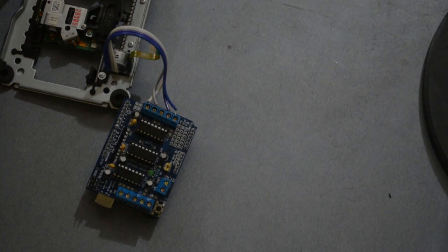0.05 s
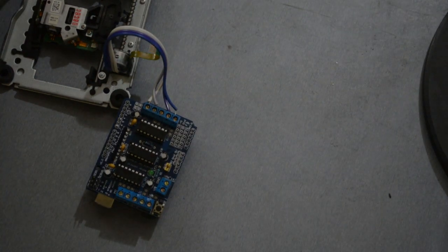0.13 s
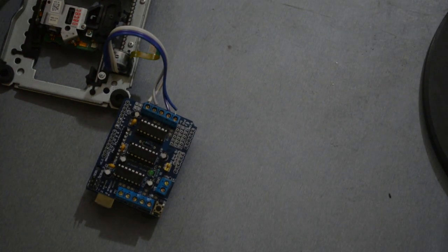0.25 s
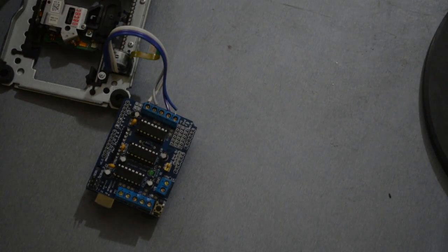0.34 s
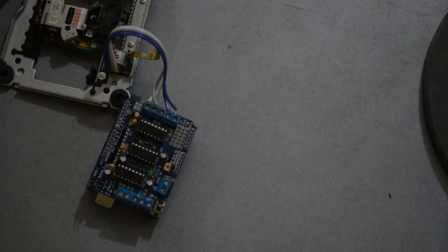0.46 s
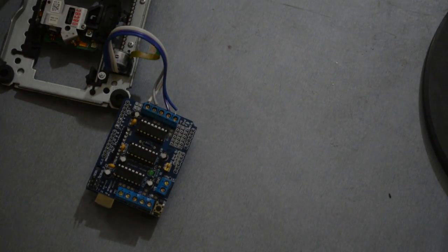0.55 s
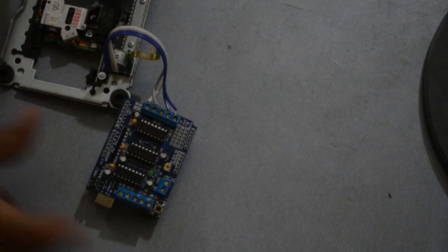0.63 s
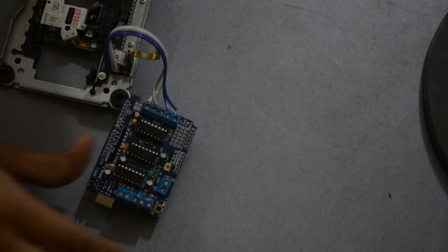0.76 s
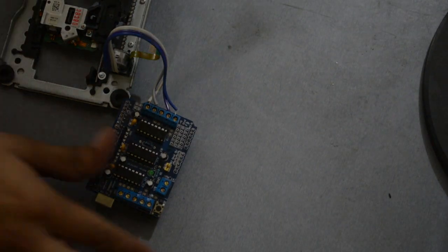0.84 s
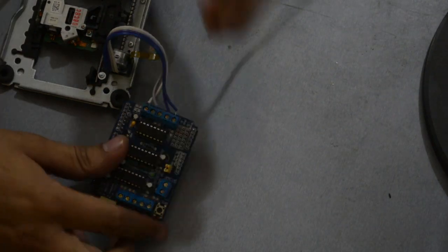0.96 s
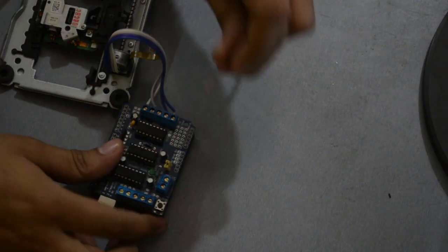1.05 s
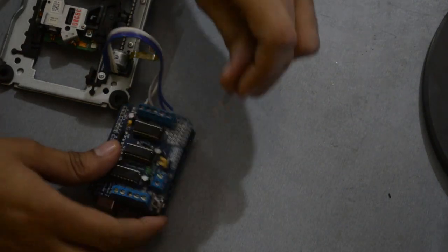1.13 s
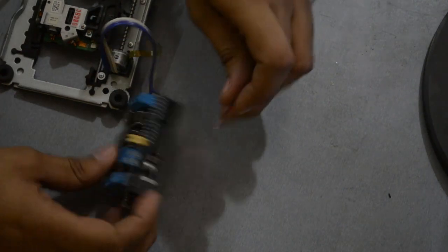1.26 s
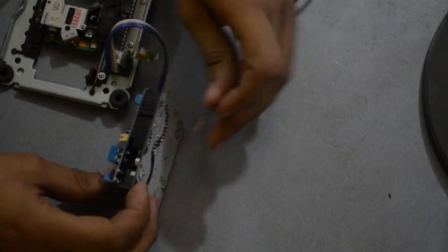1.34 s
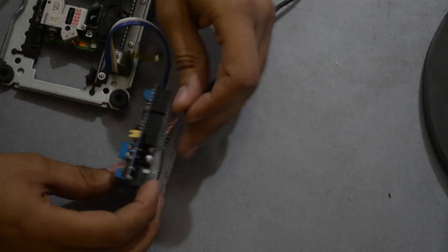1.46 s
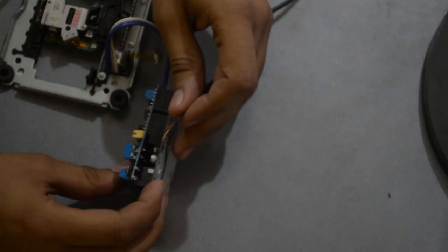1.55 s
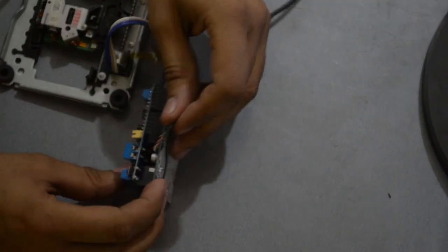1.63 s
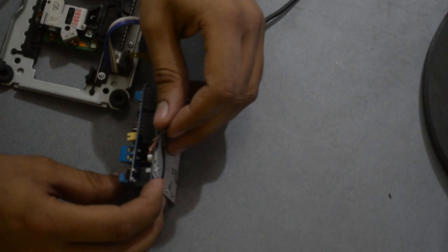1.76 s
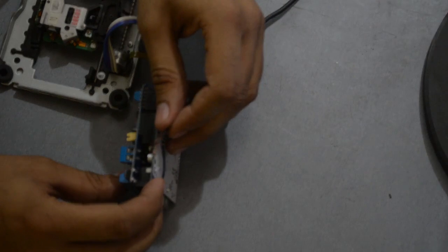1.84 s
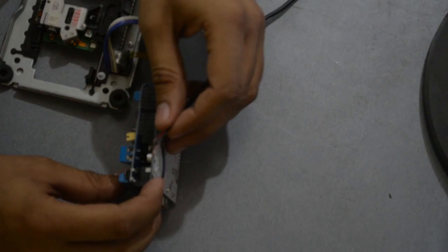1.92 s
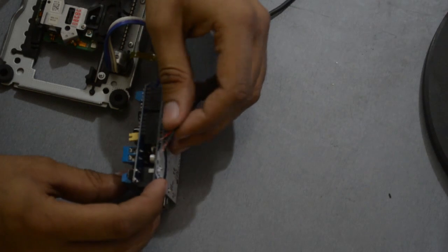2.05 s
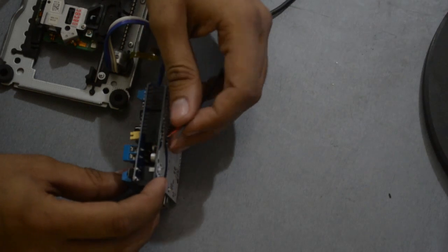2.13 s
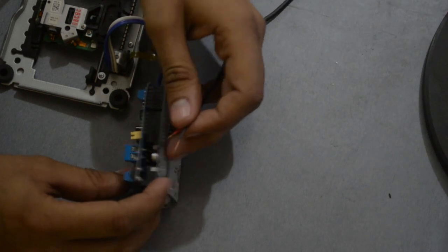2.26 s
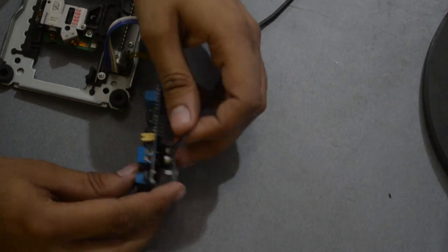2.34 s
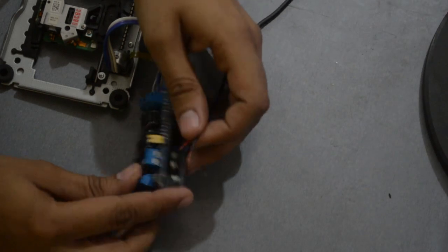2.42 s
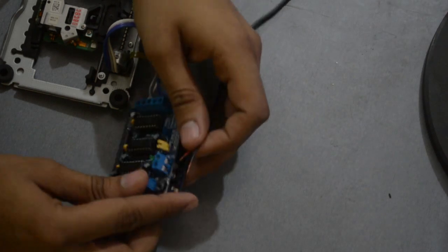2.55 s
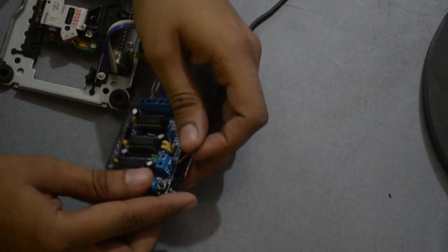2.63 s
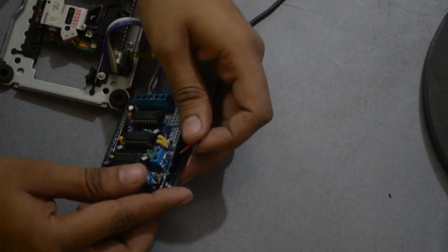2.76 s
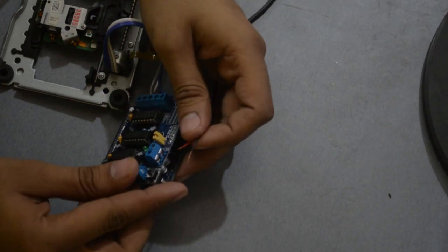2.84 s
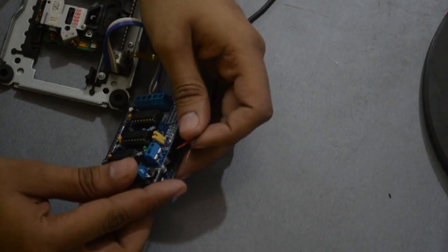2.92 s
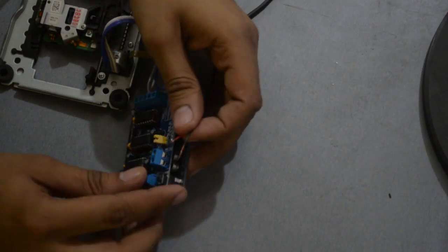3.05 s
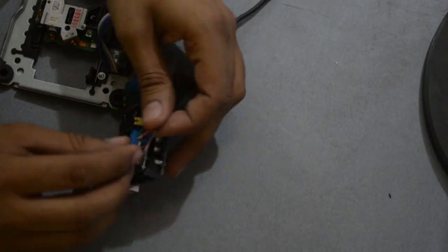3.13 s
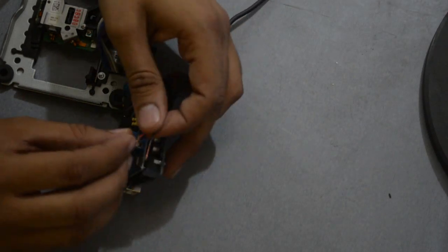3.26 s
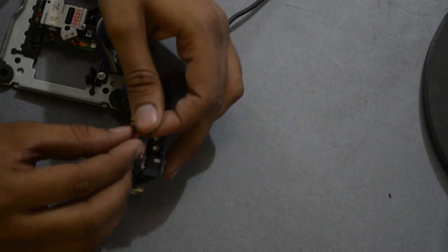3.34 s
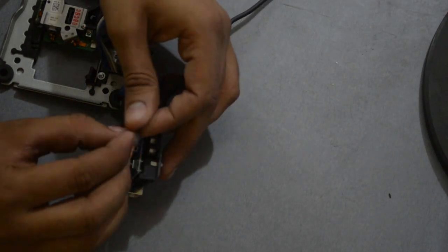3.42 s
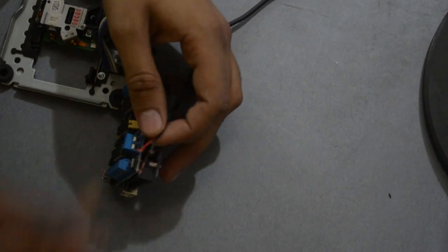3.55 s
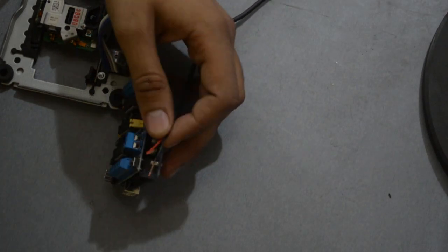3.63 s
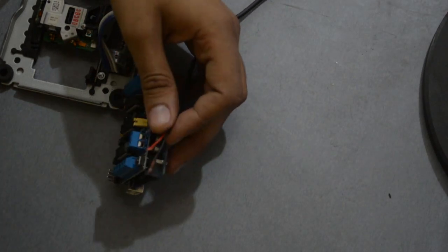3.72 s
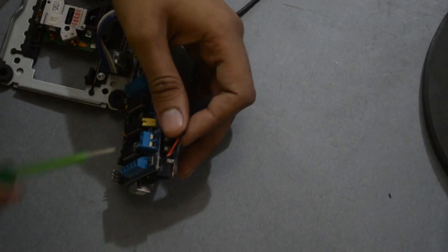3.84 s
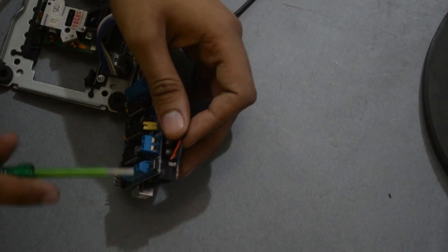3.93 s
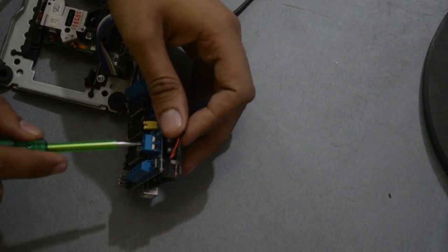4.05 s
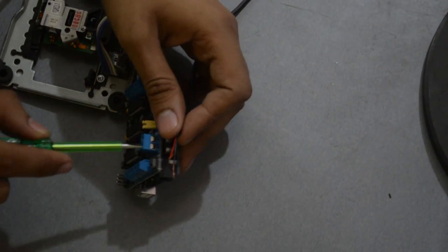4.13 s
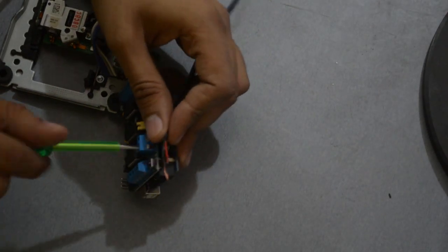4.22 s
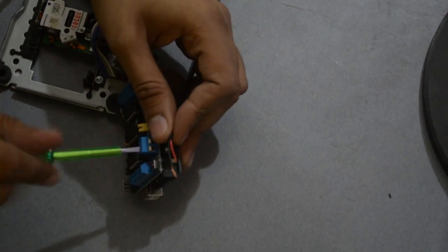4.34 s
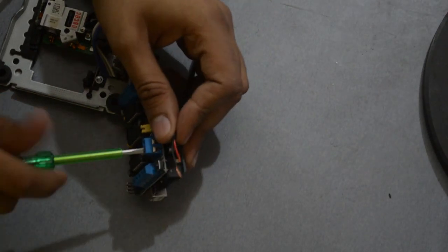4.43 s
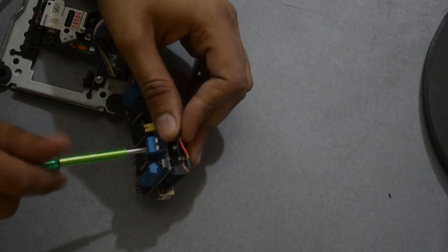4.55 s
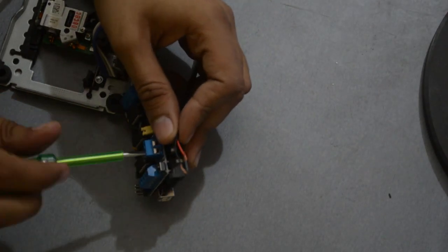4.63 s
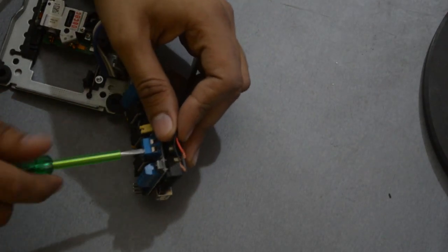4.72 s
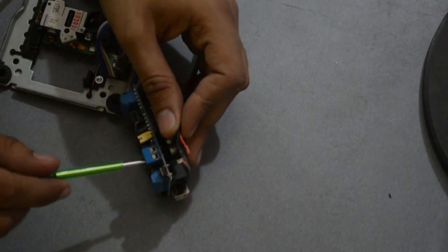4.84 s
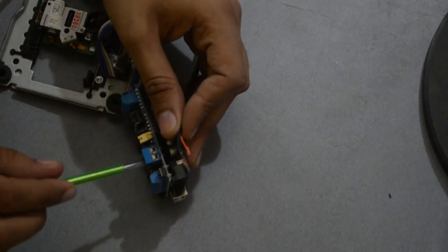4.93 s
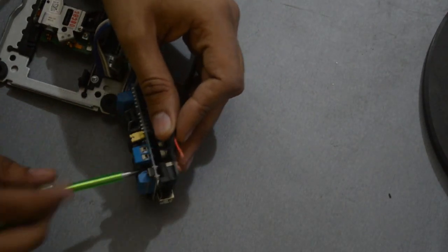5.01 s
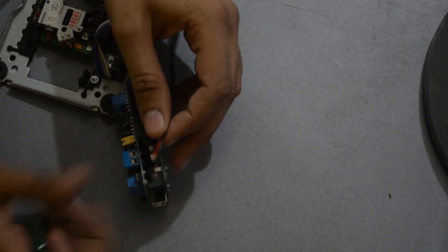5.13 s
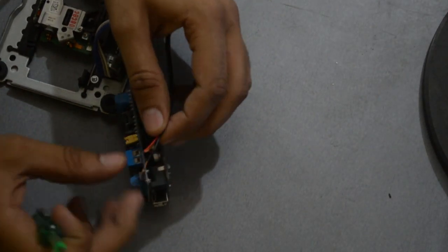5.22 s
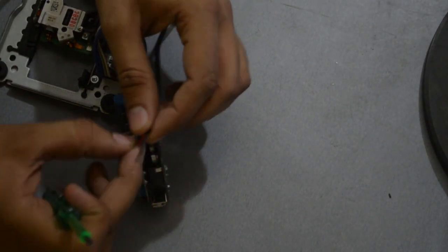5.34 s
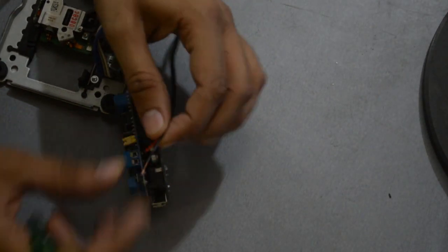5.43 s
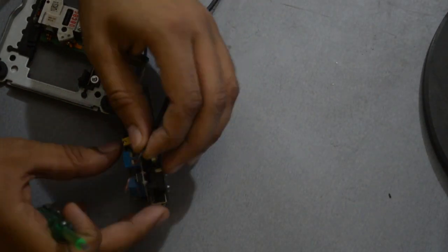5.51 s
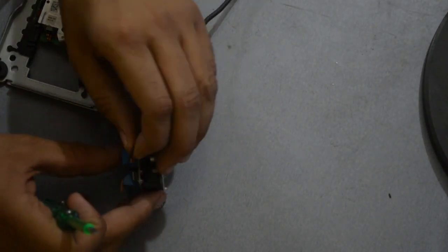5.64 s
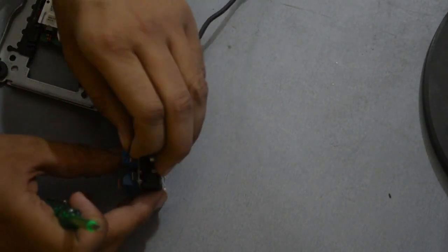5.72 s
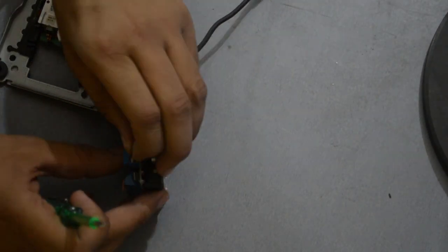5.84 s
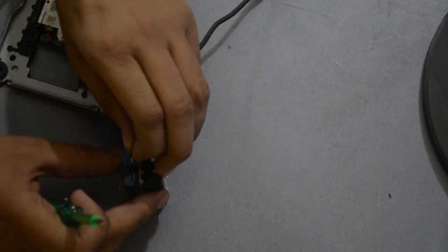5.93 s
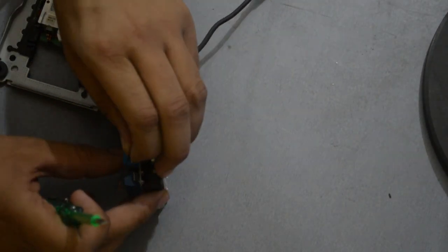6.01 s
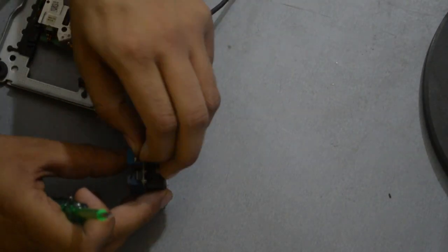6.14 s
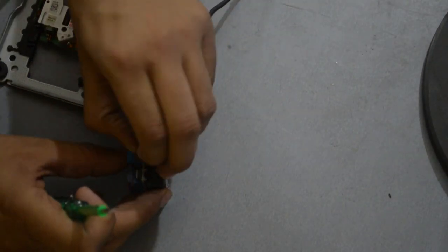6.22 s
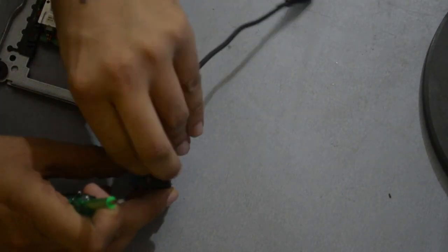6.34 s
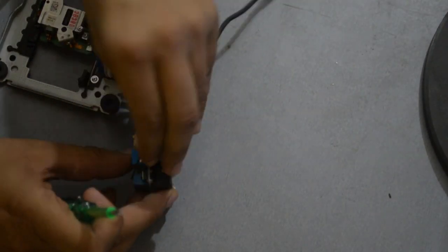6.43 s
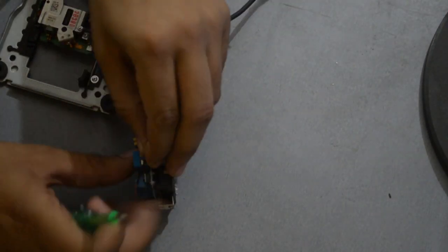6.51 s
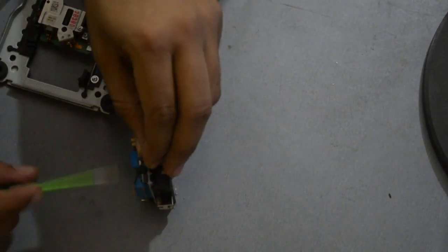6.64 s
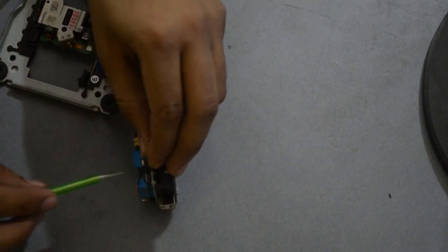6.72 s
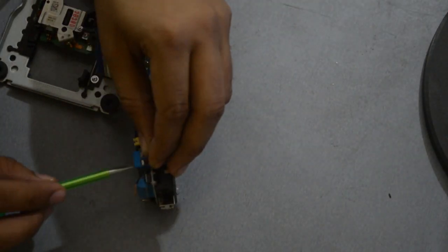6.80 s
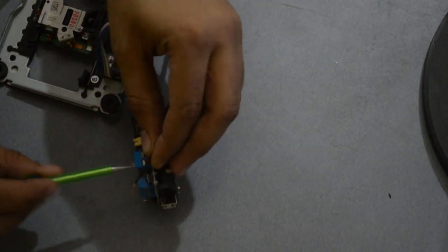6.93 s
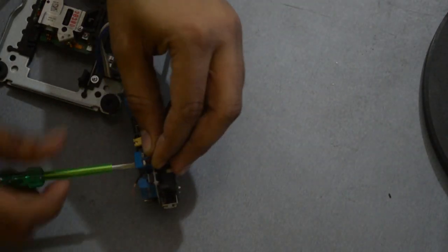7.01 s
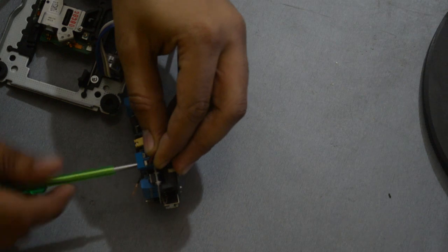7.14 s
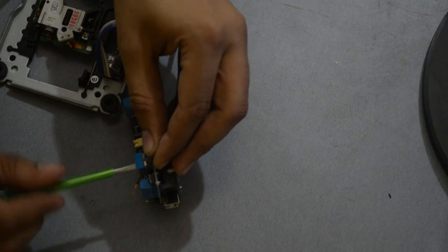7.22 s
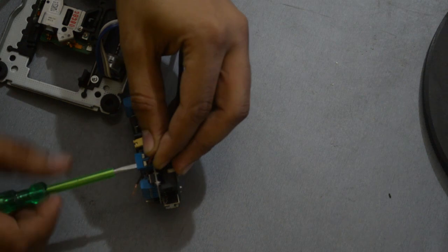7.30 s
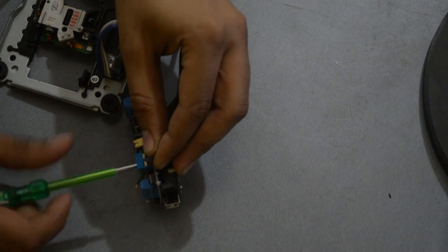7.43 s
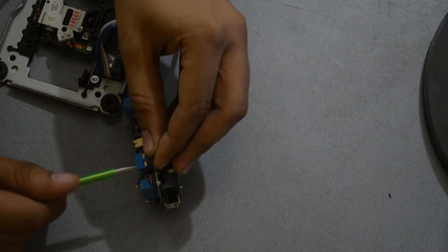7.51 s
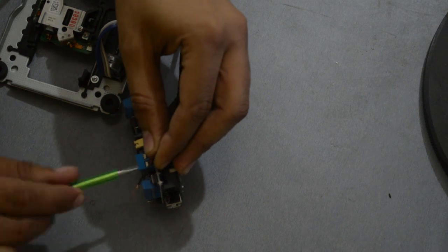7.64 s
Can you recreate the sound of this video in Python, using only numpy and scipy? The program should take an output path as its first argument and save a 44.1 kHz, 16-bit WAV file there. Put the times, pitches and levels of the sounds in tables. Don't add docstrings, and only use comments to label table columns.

```python
import sys
import numpy as np
from scipy import signal
from scipy.fft import rfft, irfft
from scipy.io import wavfile
from scipy.ndimage import uniform_filter1d, map_coordinates

SR = 44100
rng = np.random.default_rng(int(sys.argv[2]) if len(sys.argv) > 2 else 0)


def decibels_to_gain(level_db):
    exponent = np.asarray(level_db, float) / 20
    return 10 ** exponent


def wrap_up_sound(samples):
    columns = np.atleast_2d(samples).T
    tamed = np.clip(columns, -1, 1)
    steps = np.round(tamed * 32767).astype(np.int16)
    wavfile.write(sys.argv[1], SR, steps)


N = 338247
CUT_S, SLOW, FAST = 2.785, 1.0, 3.24


def on_log(table, hz):
    return np.interp(np.log(hz + 1), np.log(np.array(table)[:, 0]), np.array(table)[:, 1])


def unit(x):
    return x / np.sqrt(np.mean(x ** 2))


def curve(table, silent_db=-110):
    s, *columns = np.transpose(table)
    t = np.arange(N) / SR
    return [decibels_to_gain(np.interp(t, s, column, silent_db, silent_db)) for column in columns]


def band(x, low_hz, high_hz):
    edges = np.clip([low_hz, high_hz], 5, .45 * SR)
    return signal.sosfilt(signal.butter(2, edges, "band", fs=SR, output="sos"), x)


def spread(mid, side, speed, width):
    share = on_log(width, np.fft.rfftfreq(len(side), 1 / SR) / speed)
    side = irfft(rfft(side) * share, len(side))
    return np.array([mid + side, mid - side])


# frequency_hz, density_db
AIR_SPECTRUM = [(20, -86), (45, -27), (80, -14.5), (145, -5.5), (200, -7), (280, -9.5), (330, -1.5),
                (630, -0.5), (1070, -3), (1630, -8), (2400, -13), (5000, -21.5), (11000, -31.5),
                (16000, -42.5)]
# time_s, level_db
AIR_LEVEL = [(0, -50.5), (.9, -50.5), (1.6, -46.5), (2.3, -51.5), (2.78, -50), (2.8, -51), (4, -50.5),
             (5.5, -51.5), (7.67, -50)]
# frequency_hz, width_hz, level_db
AIR_PEAKS = [(311, 19, -63.5), (521, 8.9, -65), (664, 10, -68.5), (1036, 79, -65.5)]
# frequency_hz, side_share
AIR_WIDTH = [(50, .12), (150, 0.19), (400, 0.2), (1000, 0.3), (2000, 0.56), (4000, 0.67), (10000, 0.75)]


def air(speed, flicker_db=1):
    hz = np.fft.rfftfreq(N, 1 / SR) / speed
    white = rfft(rng.standard_normal((4, N)))
    wide = unit(irfft(white[:2] * decibels_to_gain(on_log(AIR_SPECTRUM, hz)), N)) * curve(AIR_LEVEL)[0]
    peaks = 0
    for centre_hz, width_hz, db in AIR_PEAKS:
        resonance = 1 / (1 + 1j * 2 * (hz - centre_hz) / width_hz) ** 2
        peaks = peaks + decibels_to_gain(db) * unit(irfft(white[2:] * resonance, N))
    step = int(.1 * SR / speed)
    walk = uniform_filter1d(np.repeat(rng.standard_normal(N // step + 1), step), step)[:N]
    return spread(*((wide + peaks) * decibels_to_gain(flicker_db * walk)), speed, AIR_WIDTH)


# harmonic_order, level_db
HUM = [(1, -70), (2, -61), (3, -60), (7, -66), (9, -66.5), (13, -63), (17, -107.5), (29, -71), (35, -76),
       (37, -73), (39, -76.5), (51, -87)]


def hum(speed, mains_hz=50.0, flutter=0.097):
    t = np.arange(N) * speed / SR
    lines = 0
    for order, db in HUM:
        turns = round(order) * mains_hz * t + rng.random()
        lines = lines + np.sqrt(2) * decibels_to_gain(db) * np.sin(2 * np.pi * turns)
    return lines * (1 + flutter * unit(band(rng.standard_normal(N), 6 * speed, 25 * speed)))


RATTLE_S, CONTACT_S = .0007, 0.0013


def ring(modes, speed, scatter_db=1.5, detune=0.016, crack=0.44, rattle_s=RATTLE_S, snap_s=0.0043):
    hz, db, t60 = np.transpose(modes)[:, :, None]
    t = np.arange(int(.2 * SR / speed)) * speed / SR
    level_chance, pitch_chance, delay_chance = rng.standard_normal((3, len(modes), 1))
    since = np.maximum(t - rattle_s * np.minimum(delay_chance ** 2, 3), 0)
    facing = (-1.) ** np.arange(len(modes))[:, None]
    tones = facing * decibels_to_gain(db + scatter_db * level_chance)
    tones = tones * np.sin(2 * np.pi * hz * (1 + detune * pitch_chance) * since)
    tones = (tones * np.exp(-np.log(1000) * since / t60)).sum(axis=0)
    snap = rfft(rng.standard_normal(len(t)) * np.exp(-t / snap_s))
    snap = irfft(snap / np.sqrt(uniform_filter1d(abs(snap) ** 2, size=30)), len(t)) * (t < .1)
    low_hz, high_hz = hz.min() * speed, hz.max() * speed
    tones, snap = band([tones, snap], 0.53 * low_hz, 1.07 * high_hz)
    snap = band(snap, 0.71 * low_hz, high_hz)
    blow = tones / abs(tones).max() + crack * snap / abs(snap).max()
    blow = blow * (1 - np.exp(-t / CONTACT_S))
    return blow / abs(blow).max()


def knocks(table, parts, speed, trim_db, crack=0.49, rattle_s=RATTLE_S, snap_s=0.0035):
    out = np.zeros(N + SR)
    for s, peak_db, *parts_db in table:
        for modes, db in zip(parts, parts_db):
            blow = ring(modes, speed, crack=crack, rattle_s=rattle_s, snap_s=snap_s)
            start = int(s * SR)
            out[start:start + len(blow)] += blow * decibels_to_gain(peak_db + db + trim_db)
    return out[:N]


# frequency_hz, level_db, t60_s
BENCH = [(319.1, -2, 0.21), (336.7, -7.5, 0.075), (275, -36.5, 0.03), (427, -9, 0.12)]
BOARD_LOW = [(454, -4, 0.017), (610, -3, 0.017), (611, -6.5, 0.032), (767, 10.5, 0.0035), (955, 4, 0.019)]
BOARD_MID = [(1007, -5.5, 0.013), (1010, -11, 0.0058), (1220, -3, 0.022), (1289, 1, 0.018),
             (1300, 3, 0.0043), (1554, -20, 0.006), (1675, -7, 0.0068)]
BOARD_HIGH = [(1977, -1, 0.013), (2066, -6, 0.018), (2250, -2, 0.011), (2310, -11, 0.027),
              (2564, 5, 0.0066), (3016, -6.5, 0.025), (3370, -10, 0.0075), (3600, -10, 0.011),
              (4100, -1, 0.002), (4500, -18.5, 0.01)]
BOARD = (BENCH, BOARD_LOW, BOARD_MID, BOARD_HIGH)


def struck(table, speed, trim_db, crack, resting_db):
    blows = [(s, db, bench_db + resting_db, flex_db, 0, hard_db)
             for s, db, bench_db, flex_db, hard_db in table]
    return knocks(blows, BOARD, speed, trim_db, crack=crack)


# start_s, board_middle_db, then relative to it bench_db, flex_db, hardness_db
KNOCKS = [(0.959, -15.5, -10, -10, 0), (0.964, -22.5, -21, -3, -2), (1.0365, -10, -33, 2.5, 8.5),
          (1.0405, -13.5, -2, -8, -2), (1.043, -21, -16, -9, -1), (1.047, -32, 0, -21, -21),
          (1.072, -12, -5, -7, 10.5), (1.076, -16.5, -18.5, -6, 8), (1.082, -28, 0, -12, -3),
          (1.088, -23, 3, 4, -3), (1.157, -13.5, -17, -5, -16), (1.3035, -7, -9, -7, -7),
          (1.3505, -5, -15.5, -6.5, -6.5), (1.364, -15, -16, -6, -9), (2.4, -31, 3, 5.5, -5),
          (2.412, -50, -12, -1, -10), (2.499, -36.5, 4, -2, 8.5)]


def board_knocks():
    return struck(KNOCKS, SLOW, 0.58, crack=0.63, resting_db=0.5)


# frequency_hz, level_db, t60_s
METAL = [(4600, -12, 0.004), (4850, -7, 0.0058), (4870, 3.5, 0.0041), (5740, -8, 0.0013),
         (6600, -14, 0.0026), (7500, -1, 0.005), (9340, 0.5, 0.0043), (11060, -4, 0.0042)]
# start_s, peak_db, metal_db
JOLTS = [(0.9592, -26.5, -2), (1.036, -14.5, -5.5), (1.073, -11, -4), (1.305, -25.5, 2), (1.3519, -18, 2),
         (2.4009, -41, 0)]


def jolts():
    return knocks(JOLTS, [METAL], SLOW, 0.28)


# start_s, peak_db, pitch_hz, t60_s
PINGS = [(0.9595, -31, 4840, 0.03), (0.965, -17.5, 2700, 0.016), (0.966, -16, 1220, 0.024),
         (1.039, -1.5, 1370, 0.015), (1.037, -19, 8500, 0.0068), (1.041, -10, 2920, .012),
         (1.048, -8, 3725, 0.015), (1.06, -23, 4500, .012), (1.055, -24, 4130, 0.013),
         (1.075, -2.5, 2250, 0.014), (1.083, -18, 2700, .012), (1.088, -22, 3900, .012),
         (1.305, -19, 1190, 0.02), (1.315, -33, 4850, 0.036), (1.353, -23, 1370, 0.0061),
         (1.364, -16, 2000, .012), (1.36, -36, 4850, .03), (1.602, -40, 1050, 0.017),
         (1.785, -40, 1300, 0.028), (1.985, -37, 1120, 0.023), (2.403, -22.5, 935, 0.021),
         (2.47, -31, 1974, 0.022), (2.5, -39, 3070, .015), (2.501, -33, 1210, .015)]
# start_s, peak_db, pitch_hz, t60_s
FAST_PINGS = [(3.106, -25, 3050, .008), (3.61, -27.5, 4090, 0.0089), (3.71, -28, 4500, .008),
              (3.739, -24, 5300, 0.0065), (3.826, -22, 4500, 0.011), (3.845, -17, 4410, 0.0085),
              (3.852, -35, 4200, 0.0054), (3.846, -38, 1960, .01), (4.182, -35, 3870, .006),
              (4.527, -26, 3900, 0.0056), (4.835, -32, 2900, .01), (4.835, -33, 6000, .005),
              (5.033, -28.5, 8170, 0.023), (5.033, -17.5, 4150, 0.0038), (6.736, -46, 4000, 0.0093),
              (7.036, -38, 6200, .006), (7.041, -21.5, 6140, 0.0085), (7.042, -25, 3150, 0.0087),
              (7.53, -40, 3320, 0.007), (7.53, -36, 7530, 0.011), (7.531, -38, 4080, .006),
              (7.532, -43, 2430, .007)]


def pings(table, speed):
    out = 0
    for s, db, pitch_hz, t60_s in table:
        hz, t60 = pitch_hz / speed, t60_s * speed
        pair = [(hz, 0, t60), (1.035 * hz, -4, 1.1 * t60)]
        out = out + knocks([(s, db, 0)], [pair], speed, 0, crack=0.065)
    return out


# frequency_hz, level_db, t60_s
LEGS = [(118, -9, 0.17), (159, 1, 0.084), (230, -6, 0.28)]
# start_s, peak_db, legs_db
THUDS = [
    (.96, -40, 2),
    (1.074, -29, 4.5),
    (1.305, -36.5, 1.5),
    (1.352, -32, 2),
]


def thuds():
    return knocks(THUDS, [LEGS], SLOW, 0)


# frequency_hz, t60_s
ROOM_T60 = [(200, 0.62), (400, 0.41), (700, 0.51), (1400, 0.43), (3000, 0.53), (8000, 0.31)]
# frequency_hz, level_db
ROOM_DB = [(200, -6), (400, -2.5), (800, 1.5), (1600, 0), (3000, -5.5), (8000, -2)]
# frequency_hz, side_share
ECHO_WIDTH = [(300, 0.027), (1200, 0.051), (2500, 0.18), (5000, 0.32), (10000, 0.49)]
EARLY_DB, EARLY_S = 0.5, 0.018
DRIFT_S = .00018


def room(dry, speed):
    high = signal.sosfilt(signal.butter(8, 292 * speed, "high", fs=SR, output="sos"), dry)
    bass = band(band(dry, 110 * speed, 230 * speed), 110 * speed, 230 * speed)
    dry = high + decibels_to_gain(-2.5) * bass
    t = np.arange(int(SR / speed)) * speed / SR
    hz = np.fft.rfftfreq(len(t), speed / SR)
    white, tail = rfft(rng.standard_normal((2, len(t)))), 0
    onset = (1 + decibels_to_gain(EARLY_DB) * np.exp(-t / EARLY_S)) * (1 - np.exp(-t / 0.0017))
    for centre_hz in 100 * 2. ** np.arange(8):
        octave = irfft(white * np.clip(1 - abs(np.log2((hz + 1) / centre_hz)), 0, 1), len(t))
        fade = np.exp(-np.log(1000) * t / on_log(ROOM_T60, centre_hz)) * onset
        tail = tail + octave * fade * decibels_to_gain(on_log(ROOM_DB, centre_hz)) / np.sqrt(np.sum(fade ** 2))
    spectrum = rfft(tail)
    power = abs(spectrum) ** 2
    even = np.sqrt(uniform_filter1d(power, size=500) / uniform_filter1d(power, size=16))
    tail = irfft(spectrum * even, len(t)) * (t < .9)
    wet = signal.fftconvolve(dry[None], spread(*tail, speed, ECHO_WIDTH), axes=1)[:, :N]
    wander = unit(band(rng.standard_normal(N), 8 * speed, 30 * speed))
    drift = np.arange(N) + DRIFT_S * SR / speed * wander
    return dry + np.array([map_coordinates(side, [drift], mode="nearest") for side in wet])


def rub(modes, speed, slips_per_s, spread_db=3.5, crack=0.19):
    slips = rng.random(N) < slips_per_s * speed / SR
    slips = slips * decibels_to_gain(spread_db * rng.exponential(size=N)) * rng.choice([-1, 1], N)
    part = ring(modes, speed, scatter_db=0, detune=0, crack=crack)
    return unit(signal.fftconvolve(slips, part)[:N])


# start_s, length_s, running_db, kick_db
LENS = [
    (1.183, 0.037, -41, -46),
    (1.444, 0.15, -46, -41),
    (1.657, 0.24, -48.5, -30.5),
    (1.687, 0.028, -46.5, -62),
    (1.94, 0.077, -42.5, -34),
    (2.019, 0.029, -55, -60),
]


def bursts(kick_s=0.0098, edge_s=0.0028):
    out, t = 0, np.arange(N) / SR
    for s, length_s, run_db, kick_db in LENS:
        on = np.clip(np.minimum(t - s, s + length_s - t) / edge_s + 1, 0, 1)
        kick = decibels_to_gain(kick_db) * np.exp(-np.maximum(t - s, 0) / kick_s)
        out = out + on ** 2 * (decibels_to_gain(run_db) + kick)
    return out


# start_s, peak_db, board_middle_db, board_high_db, gear_db
TICKS = [(1.1875, -42, -29, -31, 11), (1.439, -21, -26, -20, -8.5), (1.475, -26, -28, -17, -3),
         (1.5454, -28, -31, -10, -1), (1.5835, -31, -24, -4, 0), (1.5978, -25, -30, -7.5, -13),
         (1.6536, -30.5, -37, -2, -15), (1.7225, -18, -24, -16, -22), (1.7303, -25, -21, -14, -5.5),
         (1.8911, -34, -34, -6, -4), (1.94, -28, -11, -1, -18), (1.948, -39, -16, 4, -16),
         (1.9819, -34, -11, 0, -21), (1.993, -36, -8, 2, -17), (2.041, -36, -35, -4.5, -8)]
# frequency_hz, level_db, t60_s
GEARS = [(4350, -3, .007), (4720, 0, .009), (5100, -7, .006), (6000, -15, .006), (6800, -15, .006),
         (7450, -13, .006), (9500, -20, .006), (10900, -18, .005)]


def lens(left_db=-3, right_db=-2.0, apart_db=-4):
    running = bursts() * decibels_to_gain(-3.0)
    parts = (BOARD_MID, BOARD_HIGH, GEARS[:6])
    ticks = knocks(TICKS, parts, SLOW, 3, crack=.6, rattle_s=.0001, snap_s=.0013)
    drive = running * rub(GEARS, SLOW, 2700, spread_db=3.5, crack=0.049) + ticks
    apart = decibels_to_gain(apart_db) * (running * rub(GEARS[:5], SLOW, 2500, spread_db=1.5, crack=.3) + ticks)
    return np.array([drive * decibels_to_gain(left_db) - apart, drive * decibels_to_gain(right_db) + apart])


def stroke(s, length_s, db, rise_db=24, fall_db=29):
    u = (np.arange(N) / SR - s) / length_s
    return decibels_to_gain(db - rise_db * np.maximum(-u, 0) - fall_db * np.maximum(u, 0))


def gliding(gain, hz, width_hz):
    phase = 2 * np.pi * np.cumsum(hz * np.ones(N)) / SR
    wobble = band(band(rng.standard_normal((2, N)), 10, width_hz / 2), 10, width_hz / 2)
    return gain * unit(wobble[0] * np.cos(phase) + wobble[1] * np.sin(phase))


# strongest_s, length_s, level_db, centre_hz, width_hz
SWISH = [(1.3, 0.12, -46, 9760, 3520), (2.484, 0.19, -53.5, 7050, 8000), (2.49, 0.17, -51.5, 4600, 2500),
         (2.585, 0.075, -53.5, 5030, 6000), (2.776, 0.056, -55.5, 6970, 6000),
         (2.8, 0.04, -55.5, 13500, 4000), (2.845, 0.07, -53, 12300, 6000), (3.545, 0.03, -57, 10000, 900)]


def brushing():
    out = 0
    for s, length_s, db, hz, width_hz in SWISH:
        gain, hiss = stroke(s, length_s, db), gliding(1, hz, width_hz)
        out = out + spread(gain * hiss, gain * np.roll(hiss, SR), SLOW, ECHO_WIDTH)
    return out


# strongest_s, length_s, strength_db, weight_db, hardness_db
DRAG = [(2.404, 0.011, -29.5, -7, -7), (2.44, 0.14, -40, -12, -5), (2.465, 0.053, -35.5, -24, -2),
        (2.505, 0.055, -36.5, -14, 3.5), (2.575, 0.042, -40, -1, 6), (2.65, 0.08, -65, -2, -9)]
# strongest_s, length_s, strength_db, weight_db, hardness_db
FAST_DRAG = [(3.172, 0.019, -49.5, 20.5, 3.5), (3.206, 0.03, -43, -5, -11), (3.234, 0.039, -65.5, 24, -3),
             (3.774, 0.089, -42, 1.5, -1), (3.8, 0.032, -54, -20, 3), (4.438, 0.032, -41.5, 5.5, -5),
             (5.254, 0.11, -52.5, 6, -7), (5.324, 0.027, -54, 1, -4), (6.44, 0.047, -53, 0, -5),
             (5.024, 0.026, -40, 2, -7), (7.037, 0.017, -42, -2, 3)]


def drags(table, speed, trim_db):
    bench, low, middle, high = (rub(modes, speed, 2000) for modes in BOARD)
    out = 0
    for s, length_s, db, weight_db, hard_db in table:
        flex_db = -0.5 + 0.1 * weight_db
        scuff = decibels_to_gain(weight_db) * bench + decibels_to_gain(flex_db) * low + middle + decibels_to_gain(hard_db) * high
        out = out + stroke(s, length_s, db) * scuff
    return decibels_to_gain(trim_db) * out


# time_s, level_db, pitch_hz at natural speed
SQUEAK = [(2.745, -80, 4000), (2.76, -54, 3950), (2.784, -57, 3970), (2.797, -50, 3980), (2.812, -62, 3850),
          (2.825, -72, 3400), (2.838, -51, 3350), (2.85, -62, 3550), (2.875, -72, 3600)]


def squeak():
    s, _, hz = np.transpose(SQUEAK)
    t = np.arange(N) / SR
    speed = np.where(np.arange(N) < CUT_S * SR, SLOW, FAST)
    return gliding(curve(SQUEAK)[0], np.interp(t, s, hz) * speed, 700)


# start_s, strength_db, weight_db, flex_db, hardness_db
TAPS = [(3.054, -37, -3.5, 0, -8), (3.105, -23.5, -5.5, -21, -5.5), (3.167, -37, -14, -19, -10),
        (3.197, -37, -13, -6, -13), (3.478, -34.5, -7, 1, -7), (3.608, -27, -5, -2.5, -8.5),
        (3.7, -42, -15, -15, -4), (3.709, -30.5, -15, -25, 1), (3.739, -20.5, -42, -15, 7.5),
        (3.764, -28.5, -13, -21, -22), (3.787, -34, -23, -26, 3), (3.825, -27.5, -8, -23, 8),
        (3.842, -21.5, -28, 3.5, 1.5), (3.851, -17, -18.5, -5, -20), (3.864, -37, -25, -17, -11),
        (3.985, -42, -1, -8, -11),
        (4.144, -35, -4, -20, -3), (4.181, -15, -10.5, -5, -4), (4.21, -26, -29, -24, -19),
               (4.293, -42, 3.5, -9, -5), (4.332, -27.5, -4, -13, -4), (4.41, -36.5, -9, -7, -20),
               (4.456, -31.5, -7, -16, -18), (4.526, -21, -8.5, -28, -7), (4.655, -29, -8.5, -8, -12),
               (4.75, -45, -17, -12, -6), (4.821, -34, -3, -10, -7), (4.833, -21, -10, -1, -13),
               (4.9, -28, -15, 2, -7), (5.017, -43, 14, 6, -16), (5.030, -23, 0.5, 5.5, -4),
               (5.033, -18, -10, -5, -1.5), (5.204, -44.5, 5.5, 7, -12), (5.246, -39, -15, 7, -16),
               (5.315, -46.5, -1, 11, -14),
        (5.677, -28.5, -10, 3, -10), (6.428, -42, -9, 4, 1), (6.453, -30.5, -10, -4, 5.5),
                (6.507, -38, -17, -5, -14), (6.601, -34, -8.5, -7, 2), (6.735, -28, -29, -2, -8),
                (6.942, -29, -11, -4, -5), (6.977, -45, -14, -1, -11), (7.04, -19.5, -19, -4.5, -0.5),
                (7.069, -34, -24, 1, -15), (7.128, -51, 6, 1, 4), (7.18, -43.5, -3.5, 4, -6),
                (7.198, -28.5, -30, -3.5, -8), (7.243, -36.5, -19, 0, -26), (7.333, -44, -15, -5, -15),
                (7.381, -43, -17, -3, -12), (7.434, -50, 4, -5, -10), (7.53, -21, -19, -10, -12),
                (7.562, -33, -10, -3, -17.5)]


def fast_taps():
    taps = TAPS
    return struck(taps, FAST, 1.8, crack=0.58, resting_db=2.5)


def scene():
    handling = board_knocks() + jolts() + drags(DRAG, SLOW, -6.5) + pings(PINGS, SLOW)
    slow = room(handling, SLOW) + thuds() + lens() + air(SLOW) + hum(SLOW)
    wiring = fast_taps() + drags(FAST_DRAG, FAST, -3.0) + pings(FAST_PINGS, FAST)
    fast = room(wiring, FAST) + air(FAST) + hum(FAST)
    before = np.arange(N) < CUT_S * SR
    return np.where(before, slow, fast) + brushing() + squeak()


def band_limit(x):
    return signal.sosfilt(signal.butter(12, 16350, fs=SR, output="sos"), x)


def record(dry):
    dry = signal.sosfilt(signal.butter(6, 15900, fs=SR, output="sos"), dry)
    dry = dry + decibels_to_gain(-99) * band(rng.standard_normal(dry.shape), 8, 200)
    excess = dry - np.clip(dry, -.97, .97)
    shaved = signal.sosfilt(signal.butter(4, 150, "high", fs=SR, output="sos"), excess)
    return band_limit(np.clip(dry - shaved, -1, 1))


dry = scene()
out = record(dry)
wrap_up_sound(out)
```